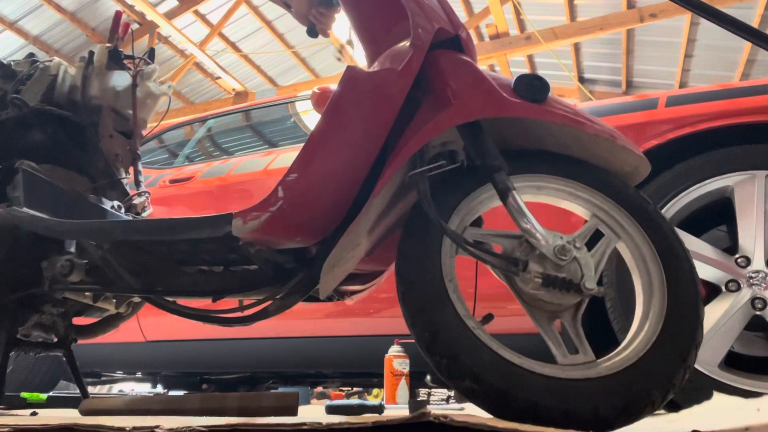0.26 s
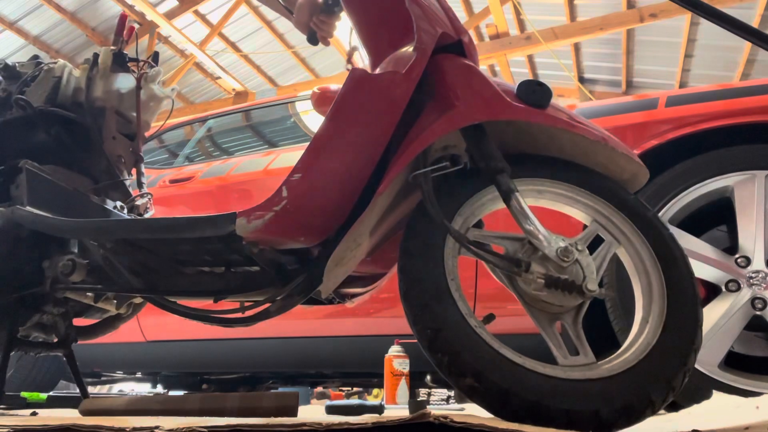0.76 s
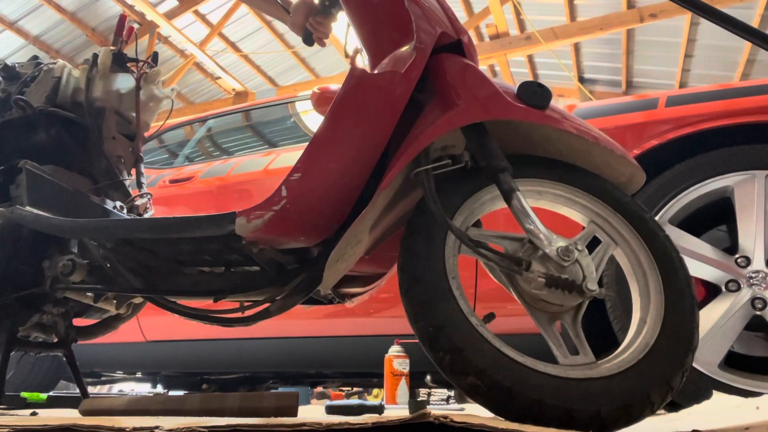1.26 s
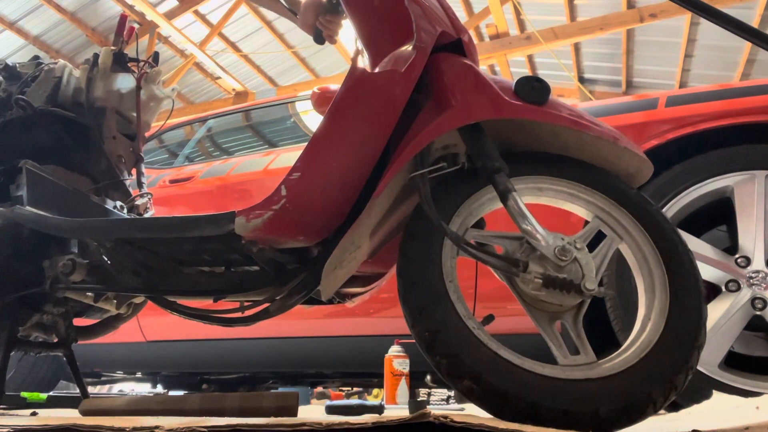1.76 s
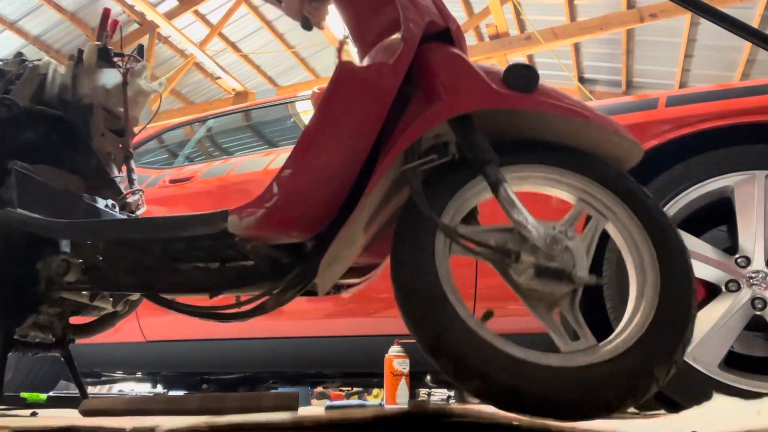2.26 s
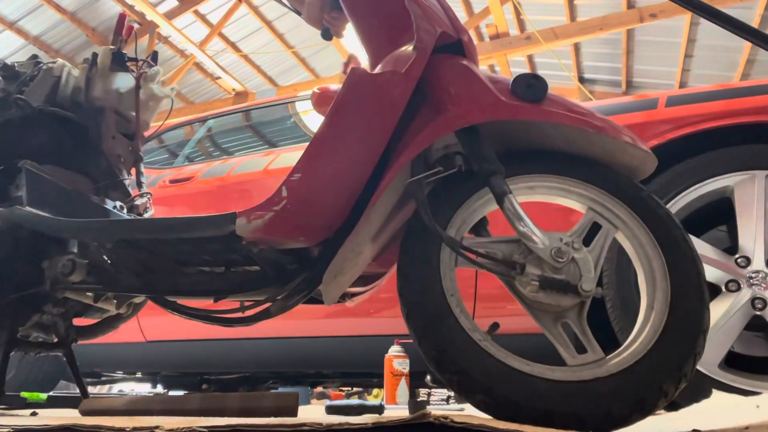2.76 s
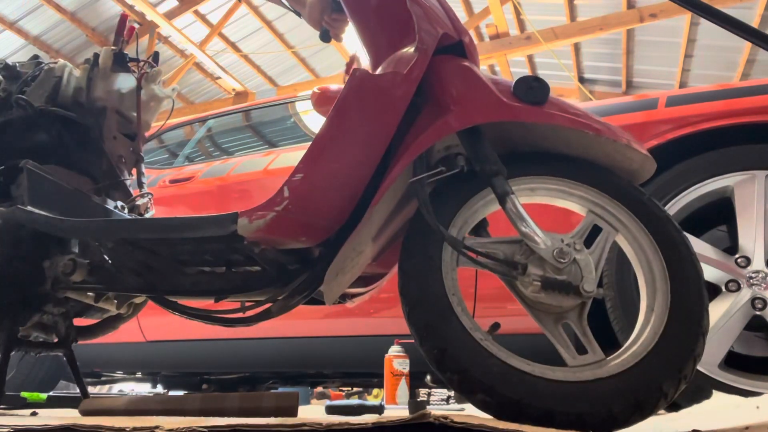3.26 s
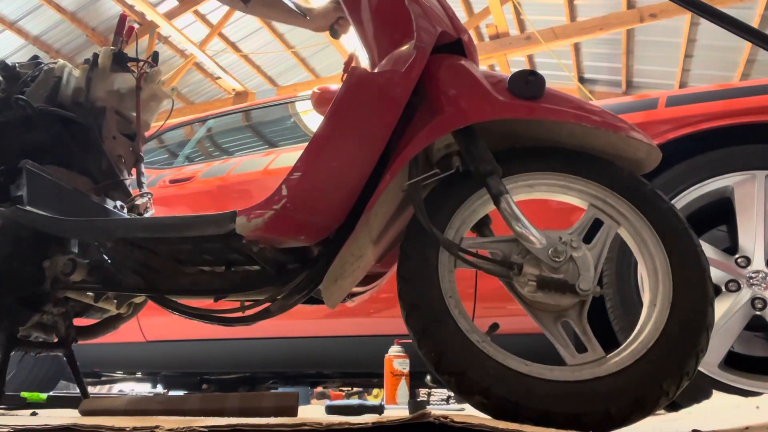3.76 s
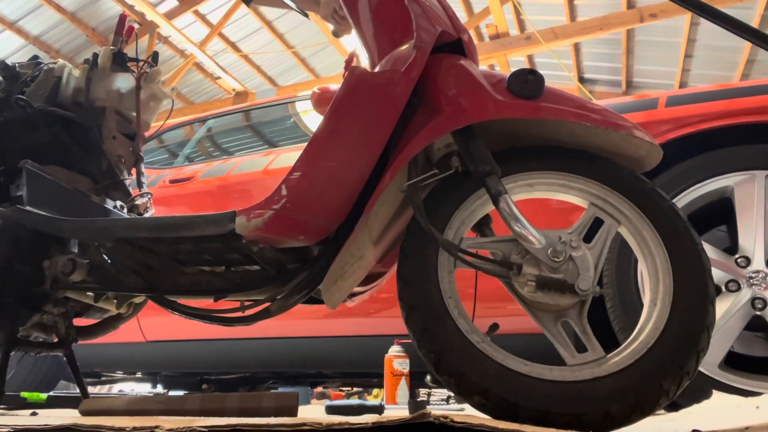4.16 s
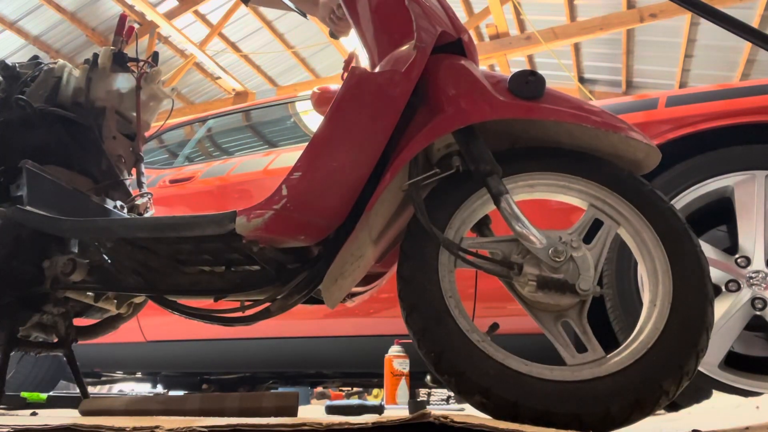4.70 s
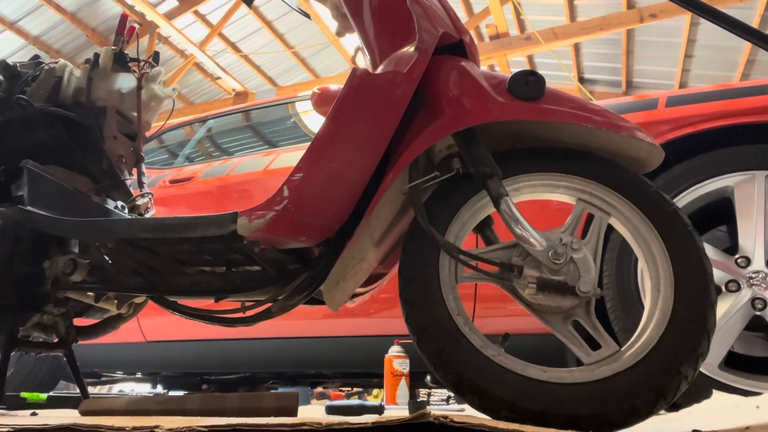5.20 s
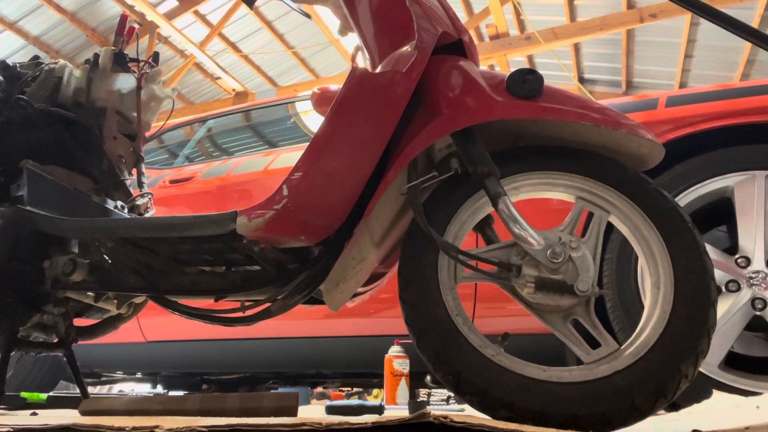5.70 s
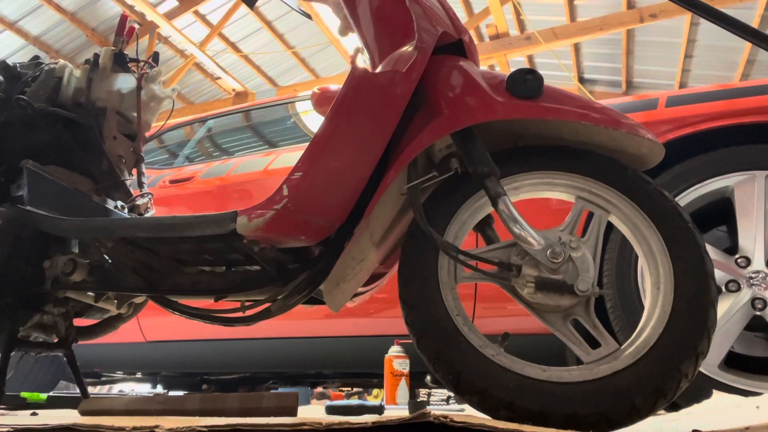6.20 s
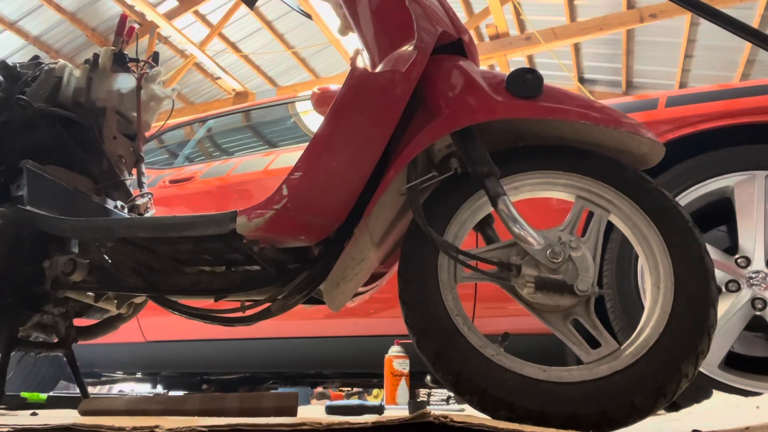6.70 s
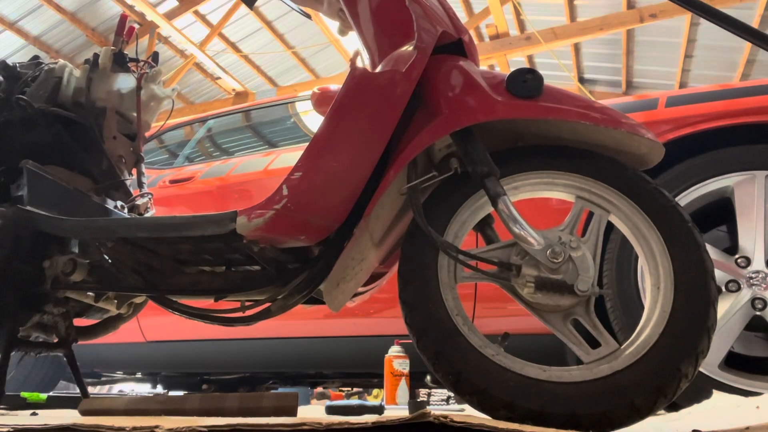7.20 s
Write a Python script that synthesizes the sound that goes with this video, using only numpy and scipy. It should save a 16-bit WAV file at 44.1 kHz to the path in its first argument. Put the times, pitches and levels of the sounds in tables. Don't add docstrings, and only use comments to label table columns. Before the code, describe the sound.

Close beside a small scooter in a shed, a kick lever clatters hard and fails. Small metal ticks, boot scuffs and cloth rustle follow. A second, heavy kick spins the engine into dull, even chuffing that stops with a knock. After a quiet pause the scene cuts abruptly: a starter rasp, a few sharp bangs, then a raspy two-stroke buzz surging and easing, still running at the end. Stereo phone microphone at floor level, short boardy echoes.

```python
import sys
import numpy as np
from scipy import signal
from scipy.fft import rfft, irfft, next_fast_len
from scipy.io import wavfile
from scipy.ndimage import uniform_filter1d

SR = 44100
rng = np.random.default_rng(int(sys.argv[2]) if len(sys.argv) > 2 else 0)


def nominal_scale(level):
    x = np.asarray(level, float) / 20
    return 10 ** x


def transcribe(u):
    v = np.clip(np.atleast_2d(u).T, -1, 1)
    q = np.round(v * 32767).astype(np.int16)
    wavfile.write(sys.argv[1], SR, q)


N = 328545
T = np.arange(N) / SR

# t/s, turns made
COAST_TURNS = [(2.37, 0), (2.448, 1), (2.733, 5), (3.445, 16), (3.59, 18), (3.66, 19), (3.732, 20),
               (3.83, 21)]
# t/s, turns made
CATCH_TURNS = [(4.934, 0), (5.265, 8), (5.293, 9), (5.335, 10), (5.373, 11), (5.44, 13), (5.5, 15)]
# t/s, speed/(turns per s), pull as level of the fourth multiple/dB
SPEED = [(5.5, 35.4, -32), (5.56, 36.2, -40), (5.74, 40.3, -42), (5.87, 50.3, -21), (5.955, 58.2, -18),
         (6.0, 62, -33), (6.04, 62.8, -33), (6.1, 60.2, -30), (6.21, 55, -30), (6.31, 57.5, -38),
         (6.42, 60.1, -19), (6.49, 62.3, -34), (6.54, 62, -33), (6.76, 56.6, -27), (6.8, 55.7, -40),
         (7.08, 55, -29), (7.35, 54.4, -29), (7.45, 54.6, -34)]
# f/Hz, width/Hz, level/dB
COAST_PIPE = [(162, 85, -5), (276.5, 38, -5), (380, 69, -10), (612, 20, 0), (745, 160, -8), (923, 150, -6),
              (1259, 16, 1)]
RUN_PIPE = [(148, 24, -9.5), (233, 39, -5.5), (315, 143, -11), (368, 44, -5.5), (455, 50, -16),
            (571.5, 43, -8.5), (653, 44, -11), (776, 82, -8.5), (910, 126, -10), (1250, 240, -15.5)]
# f/Hz, width/Hz, level/dB
COAST_FINS = [(2040, 77, -5), (2470, 110, -2.5), (2700, 62, -2), (3480, 90, -4), (4960, 55, -4),
              (5980, 82, -10), (8490, 260, -12)]
RUN_FINS = [(1720, 94, 0), (2280, 85, -2), (2720, 84, -1), (3320, 150, -6), (4950, 92, -5), (5990, 110, -1),
            (6210, 150, 0), (7580, 68, -3), (8550, 90, -7), (9010, 150, -4), (9360, 120, -5),
            (9750, 46, -7)]
# f/Hz, level/dB per Hz
COAST_HISS = [(590, -44), (1000, -2.5), (1870, -15), (2430, -8.5), (2970, -18), (3520, -13.5),
              (12500, -23.5)]
RUN_HISS = [(590, -26), (1000, -10.5), (1540, -6), (3270, -10.5), (4390, -12), (9100, -15), (12500, -16)]
# pumping/dB, exhaust/dB, clatter/dB, turbulent share/0-1
COAST_IDLE = (-40, -36.5, -40.5, 0.65)
RUN_IDLE = (-35, -27, -31.5, 0.7)
# t/s, hold/s, level/dB
COAST_HOLD = [
    (2.46, 1.16, 0.55),
    (3.66, 0.12, -1.2),
]
# t/s, load/dB
WARM = [(4.97, -2), (5.0, -4.5), (5.3, -1), (5.56, -3.5), (5.72, -3), (6.03, 0), (7.45, -1.5)]
# t/s, hold/s, load/dB
SURGES = [
    (5.47, 0.031, 3.5),
    (5.885, 0.068, 5.5),
    (6.36, 0.11, 5),
]
# t/s, crack level/dB, pipe thump level/dB, thump f/Hz
FIRINGS = [
    (5.292, -16.5, -9, 233),
    (5.338, -26, -7, 189),
    (5.374, -16, -3.5, 226),
    (5.411, -23.5, -5.5, 207),
    (5.442, -17.5, -3.5, 198),
    (5.475, -39, -6, 213.6),
]
# t/s, steady share
BLUR = [(5.27, .5), (5.55, 1.5)]
# multiple, level/dB relative to the fourth at full pull
ORDERS = [(1, -26), (2, -19), (3, -17), (4, 0), (5, -18), (6, -13), (7, -11), (8, -7), (9, -10), (10, -7),
          (11, -12), (12, -13), (14, -11), (15, -14)]
# t/s, level/dB
SETTLED = [(6.6, -1), (7.05, 1)]
# t/s, hold/s, level/dB
STARTER = [
    (4.99, 0.22, -37),
]
# t/s, hold/s, frame/dB, panels/dB relative to frame, gear/dB relative to panels
KICKS = [
    (0.0, 0.18, -34, -1, -1.5),
    (0.15, 0.12, -36.5, 2.5, 0.5),
    (0.486, 0.041, -48, 6.5, -2),
    (.6, 0.073, -57.5, -3.5, -4.5),
    (2.144, 0.22, -32.5, 0.5, -4),
    (3.805, 0.013, -36.5, -6, -5),
]
# f/Hz, level/dB per Hz
RASP = [(18, -48), (30, -29), (81, 4), (319, -11), (756, 0), (1320, -8.5), (3840, -14.5), (4950, -16.5),
        (6720, -16), (13000, -27.5)]
# t/s, peak level/dB, body/dB relative to peak, ring f/Hz, edge/dB relative to peak
CLANKS = [(0.0117, -15.5, -1.5, 2475, -12.5), (0.0972, -19, -19.5, 1370, -4), (0.114, -25, -16, 1347, -6),
          (0.1552, -12.5, -1.5, 3340, -1.5), (0.156, -4, -33, 6320, -29), (0.012, -11, -31, 6750, -15.5),
          (0.2432, -6.5, -32.5, 6800, -15.5), (1.0383, -25.5, -24, 4700, -7),
          (4.12, -34.5, -1, 1250, -18.5), (0.1753, -17.5, 4.5, 1560, -20), (0.2426, -10, -4, 3270, -7),
          (0.488, -20.5, -2, 1610, -19.5), (0.528, -14, -35, 3800, -15.5),
          (0.5428, -20.5, 2.5, 3850, -15.5), (0.659, -43, 6, 1300, -13), (0.8378, -59, 15, 1840, -14),
          (1.5809, -26.5, -4.5, 1740, -10), (1.5986, -23, -5.5, 2370, -9), (1.6139, -29.5, -0.5, 1370, 0),
          (2.114, -10.5, -3.5, 2570, -16), (2.1285, -9, -23.5, 2050, -18.5),
          (2.1846, -6, -4.5, 3470, -13.5), (2.2333, -25, 4.5, 2720, -8), (2.2693, -34, -10, 3470, 6),
          (2.2782, -23.5, -22.5, 4000, -0.5), (2.301, -12.5, -19.5, 2180, -6),
          (2.315, -26.5, -12, 3800, -2.5), (2.3628, -7, -11.5, 2520, -9.5), (2.5829, -35, 10.5, 1380, -6),
          (2.704, -39, 10.5, 2446, -13), (3.446, -32.5, -7, 2640, 1.5), (3.72, -44, -4, 2440, -19),
          (3.818, -21, -5, 2050, -8.5), (4.116, -23.5, -3, 1670, -33)]
# t/s, peak level/dB, edge/dB relative to peak
TICKS = [(0.9076, -30, -23), (0.9405, -36, -11), (0.966, -28.5, -9), (1.0146, -23.5, -3), (1.0386, -10, -8),
         (1.1188, -29, -5.5), (1.1235, -28.5, -2.5), (1.2249, -42, -14), (1.3059, -30, -8.5),
         (1.3386, -50, 2), (1.4738, -31, -16), (1.5237, -28, -6.5), (1.5601, -35.5, -6.5),
         (1.5746, -29.5, -9), (1.6486, -19, -12.5), (1.7736, -37, -8.5), (1.8007, -21, -26),
         (1.8635, -31.5, -34), (2.093, -49, -20), (3.95, -30.5, -12), (4.2646, -35.5, -18),
         (4.38, -39.5, -17), (2.1842, -18, -32), (4.6352, -50, 3), (4.6582, -38.5, -3), (4.7599, -43, -7),
         (4.8188, -31.5, -16.5), (0.4085, -39.5, 0.5), (0.6669, -47, -4), (0.7168, -46.5, -1.5),
         (1.2365, -41, -10.5), (1.4081, -46, -14), (1.4589, -53, -13), (1.9179, -48, -10.5),
         (1.94, -49.5, -7), (2.039, -46, -12.5), (2.0571, -56.5, -2.5), (4.308, -59, -19),
         (4.4931, -64, -5), (4.5165, -57, -3), (4.5409, -53, 3), (4.6153, -47, -8), (4.7864, -47, -13),
         (4.811, -38, -16), (4.857, -35, -12), (4.876, -38, -13), (4.8469, -31, -17), (4.8627, -31, -6),
         (4.8938, -32, -13), (4.9375, -47.5, 1.5)]
# t/s, peak level/dB, f/Hz, upper f/Hz, 60 dB fade/s
THUDS = [(0.02, -6.5, 106, 448, 0.051), (0.088, -25, 91.5, 420, 0.13), (0.176, -17, 220, 532, 0.14),
         (0.397, -31, 82.5, 342, 0.087), (0.831, -34, 121, 543, 0.15), (0.488, -16.5, 1654, 1245, 0.081),
         (1.605, -29, 227, 786, 0.16), (2.367, -13.5, 770, 768, 0.13), (2.119, -13.5, 89.5, 455, 0.11),
         (2.187, -9.5, 213, 523, 0.069), (2.244, -5.5, 238, 375, 0.048), (2.318, -17, 90, 310, 0.076),
         (3.82, -7, 199, 415, 0.056), (3.835, -18, 146, 382, 0.1), (3.835, -18, 73.4, 398, 0.12),
         (3.966, -17.5, 210, 410, 0.072), (3.986, -20, 85, 420, 0.068), (4.077, -52, 64.3, 349, 0.12),
         (.398, -20.5, 67, 92, 0.16),
]
# t/s, peak level/dB, f/Hz, upper f/Hz, 60 dB fade/s
RINGS = [(4.117, -29, 1292, 1637, .07), (4.13, -36, 624, 1502, .12), (4.118, -34, 3300, 3774, .05),
         (4.339, -45, 1250, 800, .06), (1.0385, -17, 5000, 4400, .015), (.487, -28, 3900, 3100, .04),
         (.49, -28, 630, 1276, .08), (.245, -19, 720, 1000, .08), (.35, -34, 900, 1200, .04),
         (.528, -25, 5900, 3700, .03), (.838, -38, 500, 560, .08), (3.968, -36, 1200, 2100, .05),
         (2.114, -16, 2380, 2050, .05)]
# t/s, length/s, first f/Hz, last f/Hz, level/dB
CREAKS = [
    (2.029, 0.066, 347, 447, -49.5),
    (4.064, 0.06, 328, 407, -44),
]
# t/s, hold/s, level/dB
SCUFFS = [(.736, 0.032, -53), (1.0, 0.24, -58), (1.6, 0.27, -57.5), (3.9, 0.017, -52), (4.075, 0.033, -53),
          (4.2, 0.16, -61), (4.89, 0.016, -65), (4.4, 0.12, -66)]
# t/s, hold/s, level/dB
SWISHES = [(1.04, 0.02, -49.5), (1.583, 0.027, -54.5), (1.85, .05, -69), (3.98, 0.0374, -59.5),
           (6.5, 0.06, -64.5), (4.61, 0.084, -71.5), (3.6, .05, -70), (0.14, .03, -50.5), (0.57, .05, -53)]
# f/Hz, level/dB per Hz
CLOTH = [(240, -32), (400, 7.5), (1990, -7), (4620, -8), (6460, -6.5), (9570, -1.5), (13000, -17)]
# f/Hz, phase/radians
PORT_LEAD = [(0, 0), (220, .65), (380, 1.4), (900, 2.8), (2500, 3.6), (4000, 6.4), (5200, 9.4), (7000, 7.8),
             (9400, 2 * np.pi), (11100, 2 * np.pi), (13300, np.pi), (14700, np.pi), (15300, 3.11)]
# f/Hz, level/dB
PORT_TILT = [(60, 1), (200, 3), (700, 7), (1300, 4), (4400, 4), (7000, 2), (8300, 0), (16000, 0)]
# f/Hz, level/dB per Hz
SHED = [(15, -56.5), (25, -25), (53, -4), (92, -8), (172, -6.5), (196, -17), (286, -15), (1160, -27.5),
        (2570, -60), (5000, -45.5), (6500, -61.5), (11000, -120)]

RUN_S = CATCH_TURNS[-1][0]
CHANGE_S, FADE_S = 4.963, 0.016
PUMP_PER_DB, CLATTER_PER_DB = -0.5, 1.03
CLEAN_PER_DB = .035


def running():
    speed = np.interp(T, *np.transpose(SPEED)[:2]) * (T > RUN_S)
    speed = speed * flicker(50, .1)
    turns = np.interp(T, *np.transpose(CATCH_TURNS)) + np.cumsum(speed) / SR
    lumps_db = 1.6 * np.cos(np.pi * turns) * (T < FIRINGS[1][0])
    load_db = np.interp(T, *np.transpose(WARM)) + lumps_db
    load_db = np.maximum(load_db, swell(SURGES, rise_db_s=57, fall_db_s=79))
    shakes = [(s, .008, 8.5 + 0.45 * crack_db) for s, crack_db, _, _ in FIRINGS]
    load_db = np.maximum(load_db, swell(shakes, rise_db_s=2800, fall_db_s=250))
    hunt = engine(turns, (4.975, 7.5), RUN_IDLE, load_db, RUN_PIPE, RUN_FINS, RUN_HISS,
                  scatter_db=-1.5, thump_hz=72.0, puff=.45, steady=np.interp(T, *np.transpose(BLUR)),
                  reed_db=8, pop_db=3.0, ring_db=-4, boom=(234.5, 65.0, -18.5, 2.0), rumble=0.62)
    return hunt + np.array([bangs() + starter(), orders(turns)])


def coasting():
    turns = np.interp(T, *np.transpose(COAST_TURNS))
    load_db = swell(COAST_HOLD, rise_db_s=63, fall_db_s=194)
    return engine(turns, (2.4, 3.8), COAST_IDLE, load_db, COAST_PIPE, COAST_FINS, COAST_HISS,
                  scatter_db=2.1, thump_hz=90.0, puff=0.38, steady=0.42,
                  reed_db=0.5, pop_db=-5.5, ring_db=-2.5, boom=(595, 48, -5.5, .93), rumble=.5)


def engine(turns, span, idle, load_db, pipe, fins, hiss, scatter_db, thump_hz, puff, steady,
           reed_db, pop_db, ring_db, boom, rumble):
    size = nominal_scale(scatter_db * rng.standard_normal((2, 400)))[:, turns.astype(int)]
    per_second = 1 / np.sqrt(np.gradient(turns) * SR + 5)
    pulses = size[0] * once_a_turn(turns)
    reed = nominal_scale(reed_db) * size[1] * once_a_turn(turns + 0.29)
    soft = int(.0008 * SR)
    knocks = uniform_filter1d(uniform_filter1d((pulses + reed) * per_second, soft), int(.0008 * SR / 2))
    phase = turns % 1
    burst = steady + size[0] * np.exp(-(phase / puff) ** 3) * (1 - np.exp(-phase / 0.099))
    on = uniform_filter1d(1. * ((T > span[0]) & (T < span[1])), size=441)

    pump_db, exhaust_db, clatter_db, share = idle
    pump_gain = 0.89 * nominal_scale(pump_db + PUMP_PER_DB * load_db)
    exhaust_gain = nominal_scale(exhaust_db + load_db)
    clatter_gain = nominal_scale(clatter_db + CLATTER_PER_DB * load_db)
    share = np.clip(share - CLEAN_PER_DB * load_db, 0, .95)
    mixed = pump_gain * crankcase(pulses * per_second, thump_hz, rumble, on)
    mixed = mixed + exhaust_gain * exhaust(knocks, burst, pipe, pop_db, share, on)
    mixed = mixed + clatter_gain * clatter(burst, hiss, fins, ring_db, load_db, on)

    boom_hz, width, boom_db, lag = boom
    late = np.sqrt(size[1]) * once_a_turn(np.maximum(turns - lag, 0)) * per_second
    pull = np.sqrt(exhaust_gain / exhaust_gain.max())
    sung = nominal_scale(boom_db) * pull * unit(ring(ring(late, boom_hz, width), boom_hz, width) * on)
    live = np.sqrt(np.mean(on))
    return live * np.array([mixed, exhaust_gain * sung])


def once_a_turn(turns):
    return np.diff(np.floor(turns), prepend=0)


def crankcase(pulses, hz, rumble, on):
    thump = unit(ring(ring(pulses, hz, 67), hz, 100) * on)
    noise = rng.standard_normal(N)
    return thump + rumble * unit(ring(ring(noise, hz, 65), hz, 65) * on)


def exhaust(knocks, burst, pipe, pop_db, share, on):
    pops = unit(ring(ring(knocks, 270, 770), 283, 990) * on)
    beats = unit(unit(body(knocks, pipe) * on) + nominal_scale(pop_db) * pops)
    gas = unit(body(burst * rng.standard_normal(N), pipe) * on)
    return np.sqrt(1 - share) * beats + np.sqrt(share) * gas


def clatter(burst, hiss, fins, ring_db, load_db, on):
    metal = colour(burst * grit(2, 1500) * on, hiss, 1300, 16000)
    ringing = unit(sum(nominal_scale(db) * flicker(24, 4.0) * ring(metal, hz, 0.51 * width) for hz, width, db in fins))
    return unit(metal + nominal_scale(ring_db + .9 * np.maximum(load_db, 0)) * ringing)


def orders(turns):
    full_db = -18.5
    pull_db = np.interp(T, *np.transpose(SPEED)[::2]) - full_db
    fill_db = np.interp(T, *np.transpose(SETTLED))
    hum = np.zeros(N)
    for k, db in ORDERS:
        share = .3 if k < 4 else .9 if k > 4 else 1
        level_db = full_db + db + share * pull_db + fill_db * (1 < k < 4)
        waver = flicker(28, 5.5 * (.5 if k == 4 else 1))
        hum += nominal_scale(level_db) * waver * np.sin(2 * np.pi * (k * turns + rng.random()))
    return np.sqrt(2) * hum * np.clip((T - RUN_S) * 50, 0, 1)


def bangs():
    thumps = [(s, db, hz, 468, 0.12) for s, _, db, hz in FIRINGS]
    cracks = [(s, db, -8, -28, 2050, 0.22) for s, db, _, _ in FIRINGS]
    return thuds(thumps, upper=0.9) + hits(cracks, crack_s=0.0013, crack_db=10.5, ring_db=20.0, width=130)


def starter():
    rasp = flicker(35, 2.5) * colour(grit(3, 400), RASP, 700, 3600)
    return nominal_scale(swell(STARTER, rise_db_s=300, fall_db_s=60)) * rasp


def kicks():
    frame = flicker(14, 2.77) * colour(rng.standard_normal(N), RASP, 20, 290)
    panels = flicker(40, 3.0) * colour(grit(3, 300), RASP, 200, 1500)
    gear = flicker(60, 3.0) * colour(grit(3, 600), RASP, 1500, 16000)
    out = np.zeros(N)
    for count, part in ((3, frame), (4, panels), (5, gear)):
        strokes = [(row[0], row[1], sum(row[2:count])) for row in KICKS]
        out += nominal_scale(swell(strokes, rise_db_s=321, fall_db_s=101)) * part
    return out


def knocks_and_ticks():
    clanks = []
    for s, db, body_db, hz, edge_db in CLANKS:
        t60 = 0.095 * 0.88 ** np.log2(hz / 2000)
        clanks.append((s, db, body_db, edge_db, hz, t60))
    ticks = [(s, db, -8, edge_db + 12.0, 4600, .025) for s, db, edge_db in TICKS]
    stand = [(4.122, -41, -20, -30, hz, .4) for hz in (1290, 1500, 1650)]
    out = hits(clanks, crack_s=.003, crack_db=5, ring_db=6, width=200)
    out = out + hits(ticks, crack_s=0.0001, crack_db=13.0, ring_db=5.5, width=2000)
    return out + hits(stand, crack_s=.003, crack_db=-6, ring_db=20, width=90)


def hits(events, crack_s, crack_db, ring_db, width):
    length = 8192
    clang, edge, dull, rings = np.zeros((4, N + length))
    t = np.arange(length) / SR
    for s, db, body_db, edge_db, hz, t60 in events:
        shape = nominal_scale(-60 * t / t60) + nominal_scale(crack_db) * np.exp(-t / crack_s)
        onset = 1 - np.exp(-9 * t / crack_s)
        blow = nominal_scale(db) * rng.standard_normal(length) * shape / shape[0] * onset
        i = int(s * SR)
        clang[i:i + length] += blow
        edge[i:i + length] += nominal_scale(edge_db + 1.5) * blow
        dull[i:i + length] += nominal_scale(body_db + 12) * blow
        rings[i:i + length] += nominal_scale(ring_db) * ring(blow, hz, width)
    out = rings
    for x, band in ((dull, [300, 1500]), (clang, [1500, 5500]), (edge, [5500, 15500])):
        out = out + signal.sosfilt(signal.butter(2, band, "band", fs=SR, output="sos"), x)
    return out[:N]


def thuds(events, upper=0.7):
    length = 8192
    out, t = np.zeros(N + length), np.arange(length) / SR
    for s, db, hz, upper_hz, t60 in events:
        modes = np.sin(2 * np.pi * hz * t) + upper * np.sin(2 * np.pi * upper_hz * t)
        fade = nominal_scale(db - 60 * t / t60) * (1 - np.exp(-t / 0.0014))
        i = int(s * SR)
        out[i:i + length] += 0.47 * fade * modes
    return out[:N]


def creaks():
    out = np.zeros(N)
    for s, length, first_hz, last_hz, db in CREAKS:
        along = np.clip((T - s) / length, 0, 1)
        phase = 2 * np.pi * np.cumsum(first_hz + (last_hz - first_hz) * along) / SR
        tone = np.sin(phase) + .7 * np.sin(2 * phase)
        out += nominal_scale(db) * np.sin(np.pi * along) ** .5 * tone
    return out * flicker(120, 2.1)


def rustle():
    scuff = flicker(30, 2.5) * colour(grit(4, 200), CLOTH, 400, 2500)
    swish = flicker(45, 2.5) * colour(grit(5, 300), CLOTH, 2500, 16000)
    scuff_gain = nominal_scale(swell(SCUFFS, rise_db_s=92, fall_db_s=72))
    swish_gain = nominal_scale(swell(SWISHES, rise_db_s=92, fall_db_s=72))
    return scuff_gain * scuff + swish_gain * swish


def wide(x):
    middle = signal.sosfilt(signal.butter(8, [230, 8900], "band", fs=SR, output="sos"), x)
    middle = middle + 0.52 * ring(middle, 5700, 1000) + 0.36 * ring(middle, 1490, 600)
    k = int(SR / 320)
    slip = uniform_filter1d(np.repeat(2 * np.pi * rng.random(N // k + 1), k), k)[:N]
    again = np.real(signal.hilbert(middle, next_fast_len(N))[:N] * np.exp(2j * slip))
    return nominal_scale(-5.5 + np.array([[1.5], [-1.5]])) * again


def ports(x):
    size = next_fast_len(N + 4096)
    f = np.arange(size // 2 + 1) * SR / size
    tilt_db = np.interp(f, *np.transpose(PORT_TILT))
    lead = np.interp(f, *np.transpose(PORT_LEAD))
    half = nominal_scale(tilt_db / 2) * np.exp(.5j * lead)
    return np.array([irfft(rfft(x, size) * h, size)[:N] for h in (half, 1 / half)])


def room(x):
    t = np.arange(SR // 2) / SR
    fall = sum(nominal_scale(db) * nominal_scale(-60 * t / t60) / np.sqrt(t60) for db, t60 in ((-14, .04), (-10, .5)))
    fall = fall * np.sqrt(2 * np.log(1000) / SR) * (t > 1 / 1000)
    shared, left, right = rng.standard_normal((3, len(t))) * fall
    bass = signal.butter(2, 200, fs=SR, output="sos")
    upper = signal.butter(4, [200, 6000], "band", fs=SR, output="sos")
    out = []
    for side, db in ((left, 1.6), (right, -1.6)):
        tail = signal.sosfilt(bass, shared) + nominal_scale(db) * signal.sosfilt(upper, side)
        out.append(signal.fftconvolve(x, tail)[:N])
    return np.array(out)


def shed():
    near, far = (flicker(4.3, 0.45) * colour(rng.standard_normal(N), SHED, lo, 14000) for lo in (20, 250))
    return nominal_scale(-53.5) * (ports(near) + .3 * far * np.array([[1], [-1]]))


def unit(x):
    return x / np.sqrt(np.mean(x ** 2))


def colour(x, table, lo_hz, hi_hz):
    size = next_fast_len(N)
    f = np.arange(size // 2 + 1) * SR / size + 1
    hz, db = np.transpose([row for row in table if row[0] < 13500])
    edges = 1 / np.sqrt((1 + (lo_hz / f) ** 6) * (1 + (f / hi_hz) ** 6))
    gain = nominal_scale(np.interp(np.log(f), np.log(hz), db)) * edges
    return unit(irfft(rfft(x, size) * gain, size)[:N])


def ring(x, hz, width):
    return signal.lfilter(*signal.iirpeak(hz, hz / width, fs=SR), x)


def body(x, modes):
    return sum((-1) ** k * nominal_scale(db) * ring(x, hz, width) for k, (hz, width, db) in enumerate(modes))


def grit(spread_db, density):
    clicks = (rng.random(N) < density / SR) * nominal_scale(spread_db * np.minimum(rng.exponential(size=N), 2))
    return unit(rng.standard_normal(N) * (1 + 2 * clicks))


def flicker(rate, depth_db):
    k = int(SR / rate)
    steps = np.repeat(rng.standard_normal(N // k + 1), k)
    return nominal_scale(depth_db * 1.356 * uniform_filter1d(steps, k)[:N])


def swell(events, rise_db_s, fall_db_s):
    levels = []
    for s, hold, db in events:
        rise = rise_db_s * np.maximum(s - T, 0)
        fall = fall_db_s * np.maximum(T - s - hold, 0)
        levels.append(db - rise - fall)
    return np.max(levels, axis=0)


def scene():
    chugs, whine = coasting()
    first = chugs + kicks() + rustle() + creaks()
    first = first + thuds(THUDS + RINGS) + knocks_and_ticks()
    fade = np.clip((T - CHANGE_S) / FADE_S, -1, 1)
    before, after = np.maximum(-fade, 0), np.maximum(fade, 0)
    direct, clean = before * np.array([first, whine]) + after * running()
    near = ports(direct + clean) + wide(direct)
    echoes = np.abs(fade) * room(direct + 0.56 * clean)
    return near + echoes + (np.abs(fade) + 0.032) * shed()


def roll_off(x):
    return signal.sosfilt(signal.butter(12, 16520, fs=SR, output="sos"), x)


def record(dry):
    x = signal.sosfilt(signal.butter(4, 46, "high", fs=SR, output="sos"), dry)
    x = np.tanh(0.88 * x) / 0.77
    mix = signal.sosfilt(signal.ellip(8, .2, 50, 15800, fs=SR, output="sos"), x)
    return roll_off(mix)


dry = scene()
out = record(dry)
transcribe(out)
```